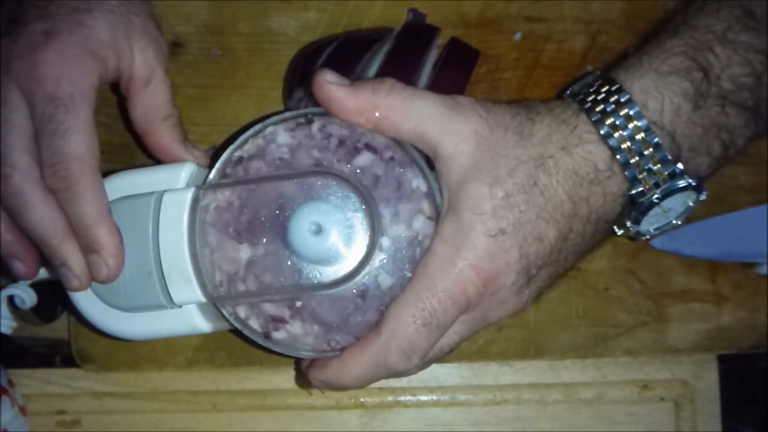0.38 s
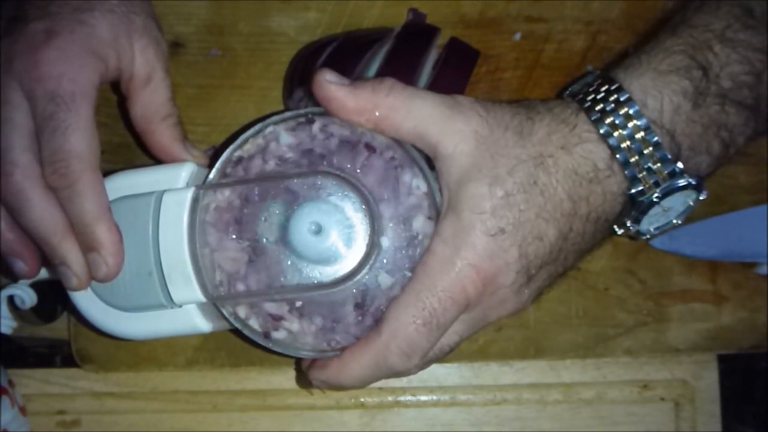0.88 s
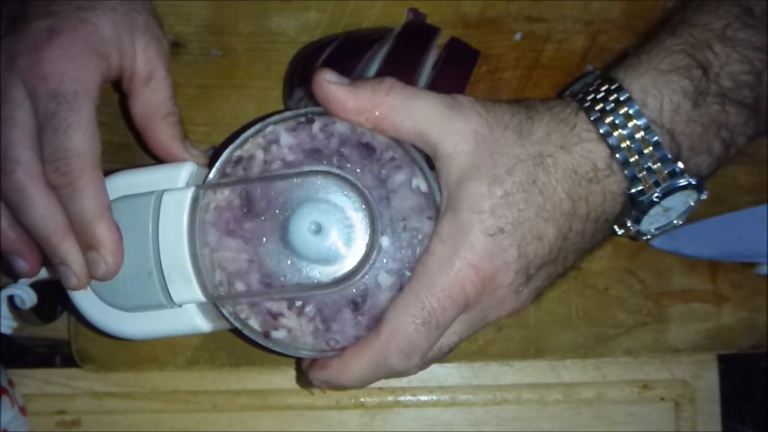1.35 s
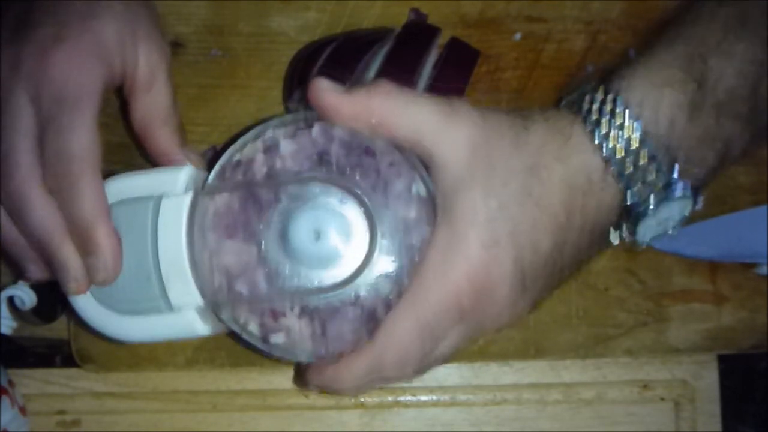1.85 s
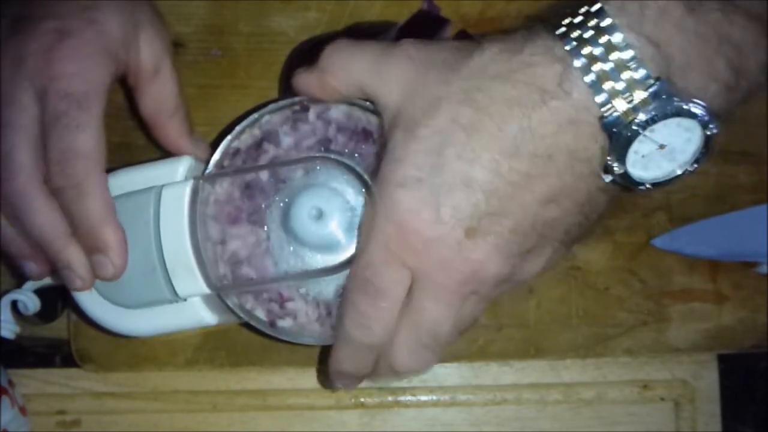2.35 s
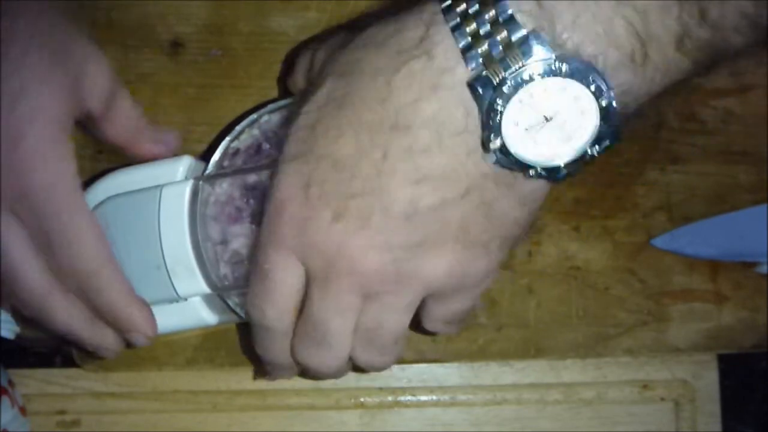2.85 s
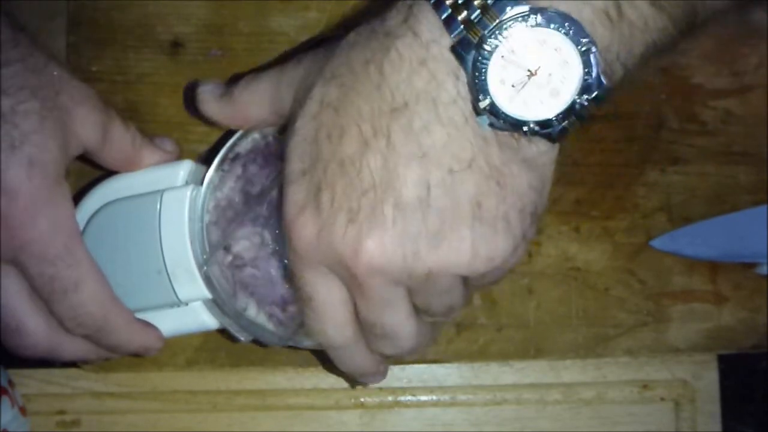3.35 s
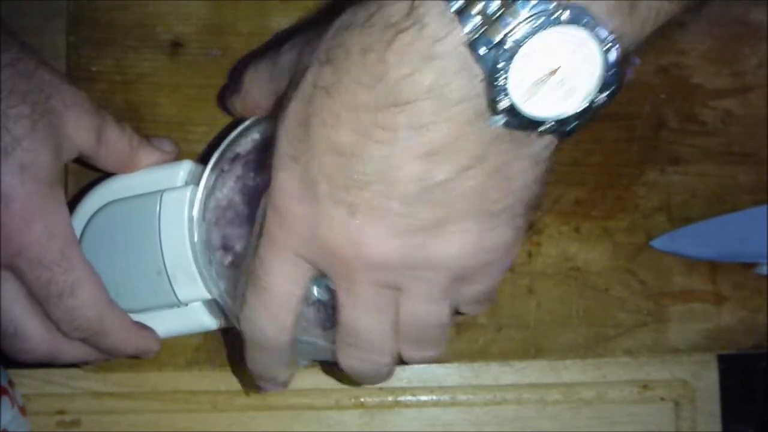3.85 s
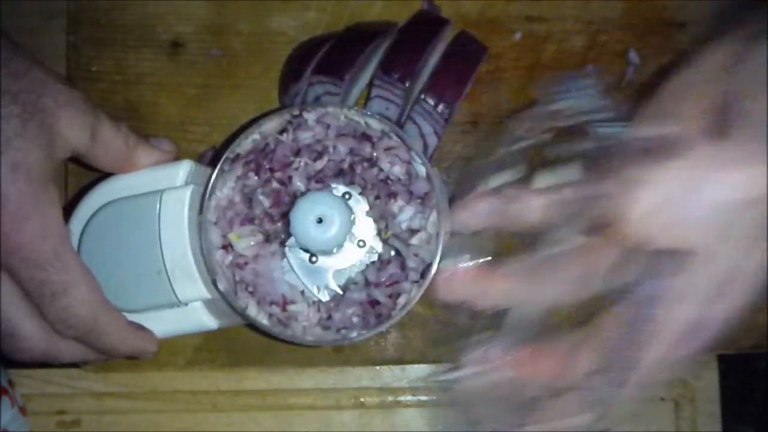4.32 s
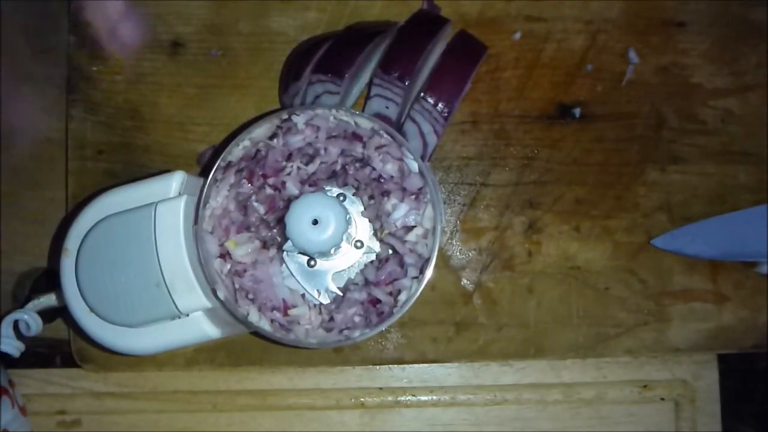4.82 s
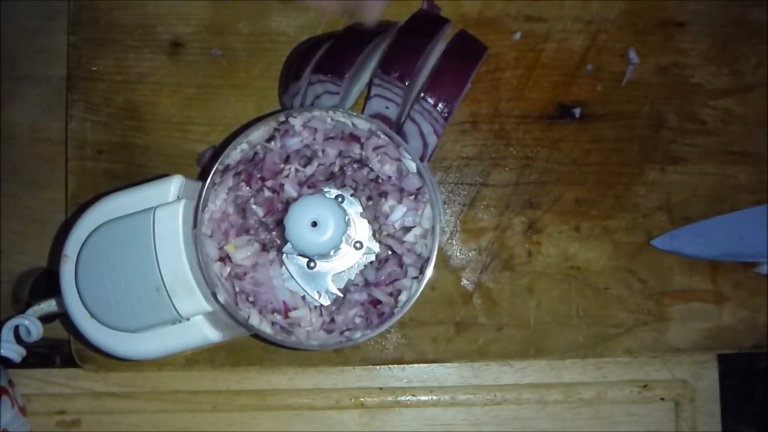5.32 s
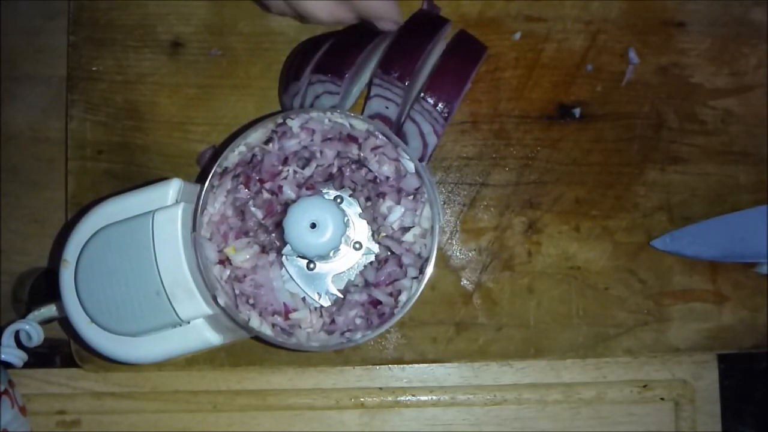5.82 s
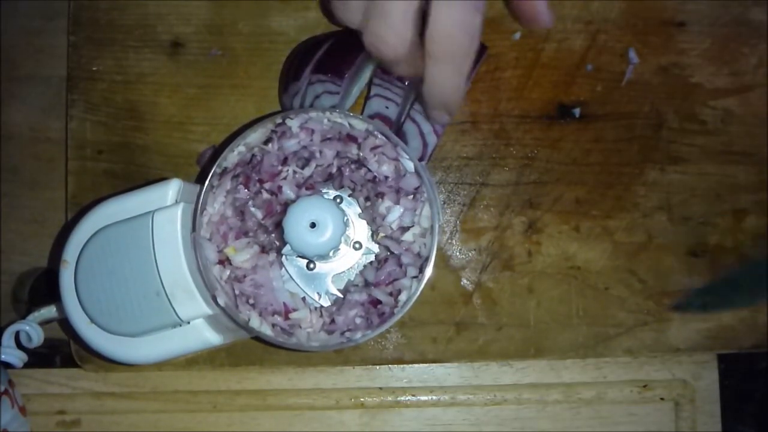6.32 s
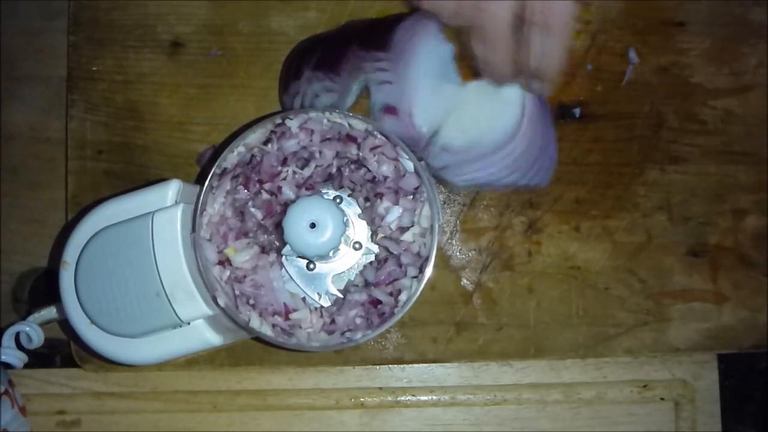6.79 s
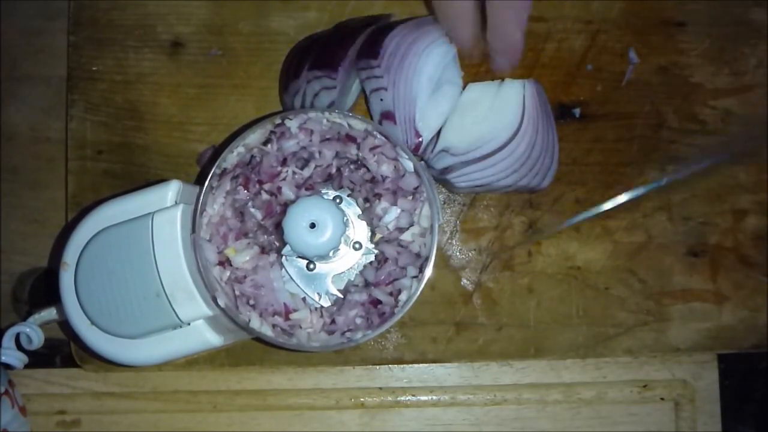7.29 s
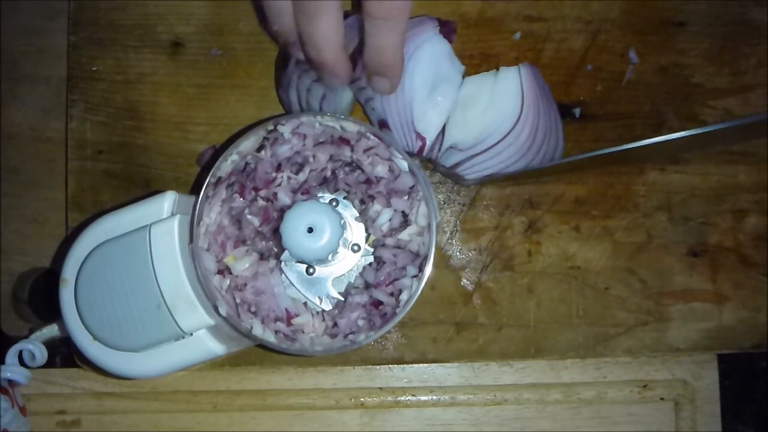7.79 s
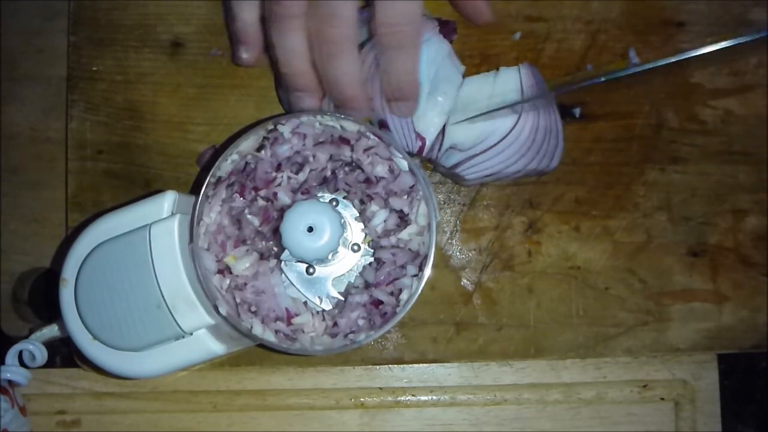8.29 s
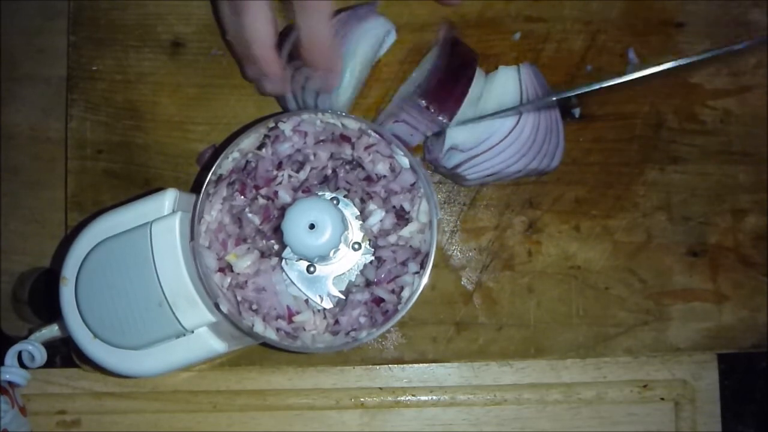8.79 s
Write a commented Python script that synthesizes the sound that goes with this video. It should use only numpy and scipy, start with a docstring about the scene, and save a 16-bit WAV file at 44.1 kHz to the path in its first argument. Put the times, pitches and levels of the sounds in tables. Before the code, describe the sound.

Close up in a home kitchen, a small geared chopper whines steadily with rough roar and brushy hiss. Knocks sound on the wooden board, then the motor is switched off and its pitch slides down to nothing. A faint plastic squeak follows, then the lid clatters as it is put aside. An onion lands with a sharp woody knock, and a knife crunches through it. Quiet background hiss, slight room echo.

```python
"""A small geared food chopper whines on a wooden board, is switched off and coasts to a stop.
Gear and armature tones follow its speed, over a roar, a rumble and brush hiss shaped by the housing.
Its plastic lid squeaks, is set aside and clatters in struck modes; an onion drops on the ringing board
and a knife crunches through it in dense clicks. Light ticks, faint kitchen echoes and a quiet hiss
complete the place; the camera microphone has three dips in its response and gain control."""
import sys
import numpy as np
from scipy import signal
from scipy.fft import rfft, irfft
from scipy.io import wavfile
from scipy.ndimage import uniform_filter1d

SR = 44100
rng = np.random.default_rng(int(sys.argv[2]) if len(sys.argv) > 2 else 0)


def voltage_ratio(decibels):
    """Convert decibels (scalar or array-like) to amplitude ratios, 20 dB per decade."""
    exponent = np.asarray(decibels, float) / 20
    return 10 ** exponent


def digitize_waveform(pressure):
    """Quantize a signal to 16-bit integers and store it at the path in sys.argv[1].

    Rows of a 2-D input are taken as channels; values are limited to [-1, 1].
    """
    field = np.atleast_2d(pressure).T
    bounded = np.clip(field, -1, 1)
    quanta = np.round(bounded * 32767).astype(np.int16)
    wavfile.write(sys.argv[1], SR, quanta)


N = 403515

# Modes of the wooden board. Each row: frequency in Hz, level in dB, longest 60 dB decay in s.
BOARD_MODES = [(257, -40, .08), (325, -45, 0.053), (380, -7, 0.078), (492, -10.5, 0.39), (590, -2, 0.04),
               (629, -14, 0.26), (695.3, 16.5, 0.067), (733, -7.5, 0.076), (880, -6, 0.045),
               (1033, -2, 0.11), (1240, -1, 0.032), (1440, -10, 0.1), (1650, -19, 0.16), (2550, -36, .04)]
# Colour of the crisp crackle and of the plastic scrape. Each row: frequency in Hz, level in dB.
CRISP_COLOUR = [(530, -51), (900, -7.5), (1250, -6.5), (1340, -15), (1770, -11), (2190, -24), (2690, -9.5),
                (2930, -17), (16000, -30.5)]
# Colour of a small dry contact. Each row: frequency in Hz, level in dB.
TICK_COLOUR = [(880, -43), (1500, -6), (2720, 2.5), (4330, -15), (13400, -28), (16000, -19)]


def evened(x):
    """Scales a signal to rms 1."""
    return x / np.sqrt(np.mean(x ** 2) + 1e-20)


def read(points, hz):
    """Reads a curve of (Hz, value) points along a logarithmic frequency axis."""
    f, value = np.transpose(points)
    return np.interp(np.log(hz + 1), np.log(f + 1), value)


def curves(rows):
    """Draws straight lines over time between rows of (s, values)."""
    s, *columns = np.transpose(rows)
    return [np.interp(np.arange(N) / SR, s, c) for c in columns]


def add(mix, s, sound):
    """Adds a sound to the mix from s seconds on."""
    part = mix[round(s * SR):][:len(sound)]
    part += sound[:len(part)]


def coloured(x, points):
    """Filters a signal by a curve of (Hz, dB) points."""
    return irfft(rfft(x) * voltage_ratio(read(points, np.fft.rfftfreq(len(x), 1 / SR))), len(x))


def high_passed(x, hz):
    """Weakens what lies below hz."""
    return signal.sosfilt(signal.butter(2, hz, "high", fs=SR, output="sos"), x)


def drift(hz):
    """Slow chance: noise below hz, rms 1."""
    return evened(signal.sosfilt(signal.butter(2, hz, fs=SR, output="sos"), rng.standard_normal(N)))


def grit(share, spread_db):
    """Dense clicks of uneven size on a share of the samples, rms 1."""
    noise = rng.standard_normal(N)
    size = voltage_ratio(spread_db * rng.exponential(1, N))
    return evened(noise * size * (rng.random(N) < share))


def ring(modes, lift_db=0):
    """Dying sines of a struck body, with 60 dB decays held within 0.01 to 0.5 s."""
    hz, db, t60 = np.transpose(modes)[:, :, None]
    t = np.arange(SR // 3) / SR
    return (voltage_ratio(db + lift_db - 60 * t / np.clip(t60, .01, .5)) * np.sin(2 * np.pi * hz * t)).sum(0)


def motor():
    """Gear tones, armature whine and noises follow the speed; all but mesh tone and hum shake the housing."""
    # Speed of the gears. Each row: time in s, gear mesh frequency in Hz.
    speed = [(0.0, 2339), (0.78, 2336), (1.27, 2358), (1.67, 2343), (2.05, 2368), (2.36, 2389), (2.4, 2360),
             (2.49, 1895), (2.59, 1560), (2.69, 1230), (2.79, 1000), (2.88, 706), (3.0, 399), (3.16, 79),
             (3.2, 42)]
    # Whine of the armature. Each row: multiple of its turning rate, base level in dB over the roar.
    armature_lines = [ (3, -3), (4, -16.5), (5, -18), (6, -15), (9, -20), (11, -25), (12, -25), (13, -26)]
    # Overtones of the mesh tone. Each row: multiple, base level in dB over the roar.
    mesh_overtones = [(2, -26), (3, -33)]
    # Colours of the three noises. Each row: frequency in Hz, level in dB.
    roar_colour = [(530, -40), (900, -13.5), (1120, -13), (1820, -10), (2050, -5.5), (2290, -0.5),
                   (2420, -3), (2880, -7), (3560, -10.5), (4000, -22), (4300, -18), (5590, -39),
                   (9460, -120)]
    rumble_colour = [(29, -59), (50, -31), (287, 0.5), (433, -5), (513, 2.5), (691, 3), (1100, -13),
                     (1430, -24), (2420, -120)]
    brush_colour = [(2290, -16), (3900, -5.5), (5060, -5), (5900, -0.5), (6290, -7.5), (7170, -2),
                    (7780, -12), (9630, -13), (11000, -11.5), (11600, -10.5), (12700, -11), (14900, -11.5),
                    (16000, -12)]
    # Resonances of housing, bowl and board. Each row: frequency in Hz, width in Hz, lift in dB.
    housing = [(275, 13, -1), (306.3, 17, 8), (369, 24.3, 9.5), (506, 21, 2), (740, 30, 0), (1223, 46, 6),
               (1467, 127, 7.5), (1655, 32, 3.5), (1720, 134, 9.5), (1866, 168, 8.5), (2200, 50, 3),
               (2587, 59, 4.5), (3000, 45, 7.5), (3260, 45, 5), (4474, 22, 8), (5740, 37, 7),
               (8600, 165, 8), (9340, 140, 8.5)]
    # Swell of a tone sliding through the housing resonances. Each row: frequency in Hz, lift in dB.
    tone_path = [(40, -58), (570, -22), (700, 4), (950, -17), (1170, -8), (1270, -6), (1430, -4),
                 (1580, -2), (1890, 3), (2100, -1), (2260, -9), (2330, 3), (2400, -4.5)]
    armature_per_mesh, blade_per_mesh, wobble_per_mesh = .5145, .0214, .0445  # cycles per mesh cycle
    switch_off_s, mains_buzz_hz, board_hum_hz = 2.4, 121.3, 692
    throb_db, hum_swell_db, coast_lift_db = 2.2, 2, 3

    t = np.arange(N) / SR
    powered, coasting = t < switch_off_s, t > switch_off_s
    mesh_hz = curves(speed)[0]
    slowing_db = 20 * np.log10(mesh_hz / mesh_hz[0])
    # base level in dB at the starting speed, plus a loss in dB for each dB of speed lost
    mesh_db = -17.5 + .6 * slowing_db
    roar_db = -21.5 + .7 * slowing_db
    rumble_db = -27 + 1.22 * slowing_db
    brush_db = -29 + 1.21 * slowing_db
    hum_db = -32 + .16 * slowing_db

    turns = np.cumsum(mesh_hz + (3 + 30 * coasting) * drift(32.7)) / SR  # mesh cycles, less steady coasting
    throb = np.sin(2 * np.pi * blade_per_mesh * turns + 3.3 * drift(10.0))  # two blades meet the food
    buzz = np.sin(2 * np.pi * mains_buzz_hz * t) * powered  # torque pulses with the mains
    wobble = 1 + 0.16 * np.sin(2 * np.pi * wobble_per_mesh * turns)  # an off-centre gear gives sidebands
    tone_db = mesh_db + read(tone_path, mesh_hz) + (1.7 + 1.7 * coasting) * drift(27)
    tone = voltage_ratio(tone_db) * np.sqrt(2) * wobble * np.sin(2 * np.pi * turns)
    overtones = sum(voltage_ratio(db + 1.5 * k * slowing_db) * np.sin(2 * np.pi * k * turns)
                    for k, db in mesh_overtones)

    jitter = np.cumsum((9 + 4 * powered) * drift(88)) / SR  # rougher under power
    spin = armature_per_mesh * (turns + jitter)
    whine = np.zeros(N)
    for k, db in armature_lines:
        line_db = db + 0.5 * (k - 2.5) * slowing_db + 4.3 * drift(114)  # high multiples fade first
        line_db += coast_lift_db * coasting * (k > 3)  # unloaded, the upper lines sing clearer
        line_db += 0.51 * read(tone_path, k * armature_per_mesh * mesh_hz)
        whine += voltage_ratio(line_db) * np.sin(2 * np.pi * k * spin)

    roar = evened(coloured(grit(0.27, 0.7), roar_colour))
    roar *= voltage_ratio(throb_db * throb + 0.88 * buzz + 1.3 * drift(35.0))
    rumble = evened(coloured(grit(.06, 1.3), rumble_colour)) * voltage_ratio(rumble_db + 2 * throb + 2.3 * drift(30))
    brushes = evened(coloured(grit(0.43, 0.79), brush_colour)) * voltage_ratio(brush_db + 1.3 * throb + 1.14 * drift(40))
    shake = voltage_ratio(roar_db) * (roar + whine + overtones) + rumble + brushes
    hum = voltage_ratio(hum_db + hum_swell_db * drift(8.9)) * np.sqrt(2) * drift(28.5)
    hum *= np.sin(2 * np.pi * board_hum_hz * t)

    hz = np.fft.rfftfreq(N, 1 / SR)
    body = 1 + sum((voltage_ratio(db) - 1) / (1 + 2j * (hz - f) / width) for f, width, db in housing)
    shaken = irfft(rfft(shake) * body, N)
    still_turning = uniform_filter1d((t < speed[-1][0] - .02) * 1., 2000)
    return (shaken + tone + hum) * still_turning


def lid():
    """Each blow starts a short rattle that rings the lid, most in the loudest region of that blow."""
    # Modes of the plastic lid. Each row: frequency in Hz, level in dB, 60 dB decay in s.
    lid_modes = [(530, -9, .04), (706, -27, .06), (970, -22, 0.11), (1120, -32, 0.1), (1273, -9, 0.13),
                 (1380, -47, 0.14), (1430, 2.5, 0.12), (1490, -15.5, 0.17), (1557, 8.5, 0.055),
                 (1664, 2, 0.045), (1815, 4.5, 0.077), (2040, -3, 0.11), (2178, 7, 0.043), (2510, -16, .03),
                 (2560, -12, 0.029), (2730, 4, 0.017), (3200, -6, .03), (3070, -3, 0.052),
                 (3270, -5, 0.021), (3460, -11, 0.065), (3500, -4, 0.037), (3590, -6, 0.018),
                 (3720, -27, 0.0071), (3950, -4, 0.016), (4880, -8.5, 0.0096)]
    # Blows. Each row: start in s, peak of the body in dB, loudest region in Hz,
    # peak of the edge modes in dB over the body, peak of the clatter in dB over the body.
    blows = [(4.924, -38.5, 910, -9, 1), (5.0908, -13.5, 980, 3, 9.5), (5.1087, -24, 1570, 11, 4.5),
             (5.1271, -16.5, 1560, -3, -14), (5.2578, -13.5, 2040, 1.5, 9.5), (5.2885, -14.5, 980, 4, -10),
             (5.3093, -18.5, 2040, -4, -4), (5.425, -34, 1490, -24, -38.5), (5.439, -26, 1490, -24, -36),
             (5.464, -21, 1490, -30, -38), (5.4865, -15, 1490, -11.5, -35),
             (5.4998, -7, 1490, -14.5, -12.5), (5.5257, -17.5, 1490, -7, -41), (5.6015, 2, 1420, -16, -3.5),
             (5.6345, -12.5, 1520, 5.5, -15), (5.648, -6.5, 1600, -14, -7), (5.668, -18, 1280, 3, -20),
             (5.7081, -14, 1390, -5, -1), (5.7347, -17.5, 1560, -3.5, -16), (5.8498, -23, 1270, -5.5, -29),
             (6.222, -5.5, 1430, -9, -47), (6.2465, 1, 1490, -7.5, -39), (6.2672, -10, 1560, 6, -34),
             (6.2742, -5, 1410, -21, -11), (6.2891, -9.5, 1520, -24, -21), (6.3098, -9, 1610, -13, -36),
             (6.3535, -19.5, 1500, -1, -13)]
    # Colour of the dense high modes. Each row: frequency in Hz, level in dB.
    clatter_colour = [(1760, -29), (3000, -6), (3550, -1), (3810, -3.5), (6260, -13.5), (9330, -15.5),
                      (11500, -20), (13000, -20), (16000, -22.5)]
    region_width_hz, soft_below_db = 97, -26  # a blow with this little clatter is fully soft
    modes, t = np.array(lid_modes), np.arange(SR // 3) / SR
    hz = modes[:, :1]
    low = hz[:, 0] < 2400
    out = np.zeros(N)
    for s, db, centre_hz, edge_db, clatter_db in blows:
        softness = clatter_db / soft_below_db
        t60, rise_s, lift, spike = (np.interp(softness, [0, 1], pair) for pair in (  # (hard, soft) blow
            (.16, 0.12), (0.00043, 0.002), (9, 24.5), (2.7, 1.9)))  # in s, s, dB, times the rattle
        noise = rng.standard_normal(len(t))
        bumps = evened(uniform_filter1d(rng.standard_normal(len(t)), 90))  # the contact comes and goes
        fade = voltage_ratio(-60 * t / t60) * (1 - np.exp(-t / rise_s))
        rattle = noise * voltage_ratio(2.34 * bumps) * fade
        rattle *= 1 + spike * np.exp(-t / 0.0011)  # hardest at first
        lift_db = lift * np.exp(-((hz - centre_hz) / region_width_hz) ** 2)
        lift_db = lift_db + 2.0 * rng.standard_normal((len(modes), 1))
        body = signal.fftconvolve(rattle, ring(modes[low], lift_db[low]))
        edge = signal.fftconvolve(rattle, ring(modes[~low], lift_db[~low]))
        clatter = coloured(np.pad(rattle, (0, 500)), clatter_colour)[:len(t)]
        for part, part_db in ((body, 0), (edge, edge_db), (clatter, clatter_db)):
            add(out, s, voltage_ratio(db + part_db) * part / abs(part).max())
    return high_passed(out, 540)  # a light shell has no bass


def board():
    """Knocks ring the wood: a body, low modes whose share differs from knock to knock, and a tick."""
    # Knocks. Each row: start in s, peak of the body in dB, peak of the low modes in dB over the body,
    # peak of the tick in dB over the body.
    knocks = [(1.788, -10, -15, -5), (1.809, -9, 0, 3), (1.826, -3.5, 0.5, -18), (1.896, -17, 11.5, 11),
              (1.936, -9, -1, 2.5), (2.059, -15.5, 7, 3), (2.099, -15, 7, 4), (3.116, -38, -12, 3),
              (3.248, -36, -7, -4), (3.615, -32, -11, -21), (6.164, -20.5, -5.5, -12),
              (6.199, -24.5, -20, -6), (6.326, -17, -13, 7), (6.819, 1, -43, -28.5),
              (8.492, -27, -13, -2.5), (8.574, -18.5, -26, -3.5), (8.611, -16.5, -25, -24),
              (8.681, -22, -19, -12), (8.694, -17.5, -16, -13), (8.719, -17, -27, -15),
              (8.736, -10, -8.5, -9), (8.838, -21.5, -22, -0.5), (8.907, -41, 4, 0), (9.099, -26, 2.5, -20)]
    contact_s, damping_per_thud_db = 0.007, 0.5  # time of a 20 dB fall; share of decay lost per dB
    t = np.arange(1800) / SR
    low = np.transpose(BOARD_MODES)[0] < 600
    out = np.zeros(N)
    for s, db, low_db, tick_db in knocks:
        noise = rng.standard_normal(len(t))
        contact = 0.038 * noise * voltage_ratio(-20 * t / contact_s)
        contact[:24] += signal.windows.hann(24)
        # a knock rich in low modes presses on the board and shortens its ring
        decay_share = np.clip(.72 - damping_per_thud_db * low_db, .1, 1)
        modes = np.array(BOARD_MODES) * [1, 1, decay_share]
        body = signal.fftconvolve(ring(modes[~low]), contact)
        thud = signal.fftconvolve(ring(modes[low]), contact)
        tick = coloured(noise * voltage_ratio(-60 * t / 0.031), TICK_COLOUR) * (t > 0)
        add(out, s, voltage_ratio(db) * (body / abs(body).max() + voltage_ratio(low_db) * thud / abs(thud).max()))
        add(out, s, voltage_ratio(db + tick_db) * tick / abs(tick).max())
    return high_passed(out, 170)  # nothing below the first mode


def crunch():
    """Cells of the onion burst as dense crackle; the push of the blade rings the damped board."""
    # Knife strokes. Each row: time in s, force of the cut in dB.
    cuts = [(8.4, -62), (8.486, -48.5), (8.56, -45.5), (8.636, -41), (8.726, -30), (8.788, -47),
            (8.846, -36.5), (8.904, -41.5), (8.945, -57)]
    wood_base_db, wood_share, wood_lag_s = -41, 0.74, .03  # the board follows the force in part, smoothed
    force_db, t = curves(cuts)[0], np.arange(N) / SR
    crackle = evened(coloured(grit(0.45, 1.3), CRISP_COLOUR)) * voltage_ratio(1.9 * drift(80))
    damped_ring = ring(np.array(BOARD_MODES) * [1, 1, .7])
    wood = evened(signal.oaconvolve(grit(0.061, 4.0), damped_ring)[:N])
    wood_db = wood_base_db + wood_share * (uniform_filter1d(force_db, round(wood_lag_s * SR)) + 41)
    cutting = (t > cuts[0][0]) * (t < cuts[-1][0])
    return (voltage_ratio(force_db) * crackle + voltage_ratio(wood_db) * wood) * cutting


def squeak():
    """Fingers twist the lid: a faint fuzzy whistle and scrape of plastic, then the catch lets go."""
    twist_s, twist_length_s, release_s, release_length_s = 3.6, .36, 3.905, 0.023
    squeak_hz, sag_hz = 2245, 70.4
    whistle_db, scrape_db, release_db = -53, -74, -54
    t = np.arange(N) / SR
    part = np.clip((t - twist_s) / twist_length_s, 0, 1)  # progress of the twist
    whistle = np.sqrt(2) * drift(60) * np.sin(2 * np.pi * np.cumsum(squeak_hz - sag_hz * part) / SR)
    scrape = evened(coloured(grit(0.11, 3), CRISP_COLOUR))
    twist = abs(np.sin(np.pi * part)) ** .4 * (part < 1)
    release = voltage_ratio(release_db) * np.exp(-((t - release_s) / release_length_s) ** 2)
    return (voltage_ratio(whistle_db) * whistle + voltage_ratio(scrape_db) * scrape) * twist + release * scrape


def ticks():
    """Tiny dry contacts, too light to ring the board: short fading bursts of coloured noise."""
    # Small ticks. Each row: start in s, peak in dB.
    nail_ticks = [(3.8994, -35), (4.4049, -32), (6.8735, -26)]
    out, t = np.zeros(N), np.arange(600) / SR
    for s, db in nail_ticks:
        tick = coloured(rng.standard_normal(len(t)) * voltage_ratio(-60 * t / 0.017), TICK_COLOUR)
        add(out, s, voltage_ratio(db) * tick / abs(tick).max())
    return out


def kitchen(x):
    """The room answers with sparse coloured echoes of random sign that die away."""
    t60_s, echo_db, spacing = 0.2, -10, 22  # spacing in samples
    taps = np.zeros(SR // 2)
    at = np.arange(200, len(taps) - spacing, spacing)
    taps[at + rng.integers(0, spacing, len(at))] = rng.choice([-1., 1.], len(at))
    fading = taps * voltage_ratio(-60 * np.arange(len(taps)) / SR / t60_s)
    tail = coloured(fading, [(200, -2), (1000, -1), (12000, -6)])  # (Hz, dB)
    return x + voltage_ratio(echo_db) * signal.oaconvolve(x, tail / np.linalg.norm(tail))[:N]


def kitchen_hiss():
    """Steady coloured noise whose level wanders very slightly."""
    # Colour of the hiss. Each row: frequency in Hz, level in dB.
    hiss_colour = [(15, -55), (25, -25.5), (127, -2.5), (236, -1), (263, -1.5), (384, -3), (463, -4),
                   (2220, -16), (2910, -17), (4030, -22), (11600, -29.5), (14000, -32), (16000, -41)]
    return voltage_ratio(-43.5 + 0.19 * drift(0.52)) * evened(coloured(rng.standard_normal(N), hiss_colour))


def scene():
    """Sums the sources, lets the kitchen answer and lays the hiss under all."""
    hiss = kitchen_hiss()
    things = motor() + lid() + board() + crunch() + squeak() + ticks()
    things = high_passed(things, 110)  # small things radiate no bass
    return (kitchen(things) + hiss)[None]


def gain_control(x):
    """Ducks at loud sounds by a share of their excess, then lets the level recover steadily."""
    threshold_db, share = -21.0, 0.29
    power_db = 10 * np.log10(abs(uniform_filter1d(x[0] ** 2, 600)) + 1e-12)
    fall = np.arange(N) * 26.5 / SR  # the held level sinks by 26.5 dB a second
    held_db = np.maximum.accumulate(power_db + fall) - fall
    over_db = np.maximum(held_db - threshold_db, 0)
    return x / voltage_ratio(share * uniform_filter1d(over_db, 400))


def microphone(x):
    """Partial notches dip the response at three places."""
    # Dips of the microphone. Each row: frequency in Hz, width in Hz, depth in dB.
    mic_dips = [(2900, 300, -24), (7850, 260, -14), (11710, 1700, -27)]
    for hz, width, db in mic_dips:
        notched = signal.lfilter(*signal.iirnotch(hz, hz / width, SR), x)
        x = voltage_ratio(db) * x + (1 - voltage_ratio(db)) * notched
    return x


def top_cut(x):
    """Nothing passes above the cut-off."""
    return signal.sosfilt(signal.butter(12, 16790, fs=SR, output="sos"), x)


def record(dry):
    """The camera's gain control acts first, then the response of its microphone."""
    mix = microphone(gain_control(dry))
    return top_cut(mix)


dry = scene()
out = record(dry)
digitize_waveform(out)
```